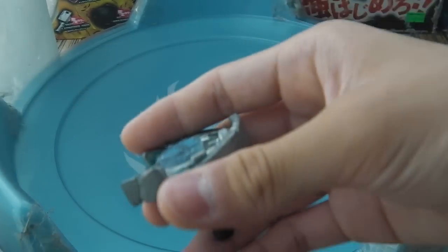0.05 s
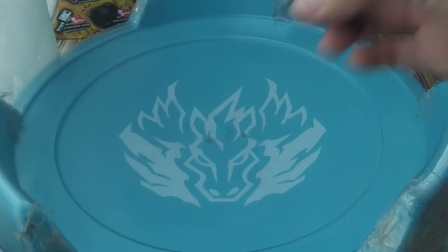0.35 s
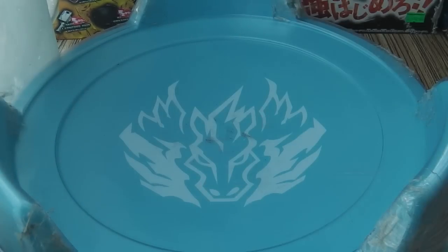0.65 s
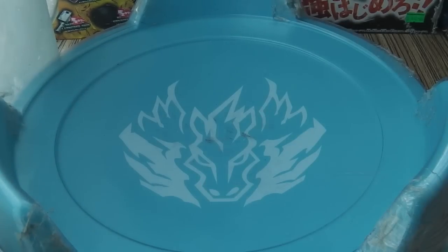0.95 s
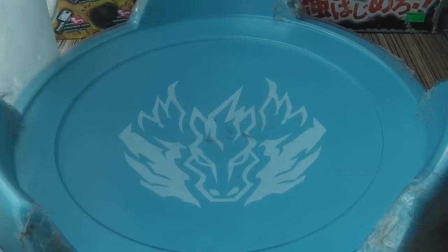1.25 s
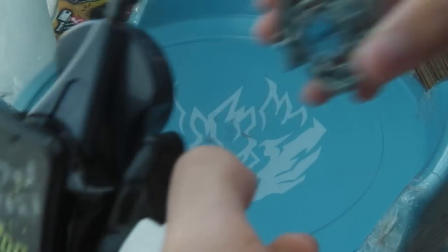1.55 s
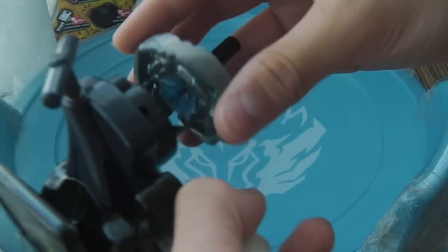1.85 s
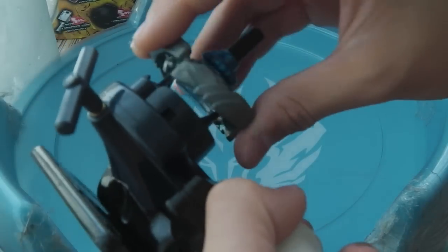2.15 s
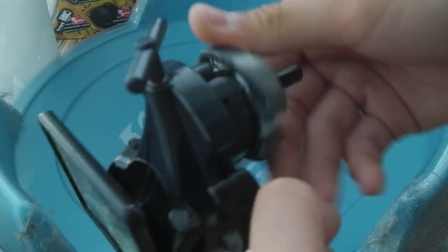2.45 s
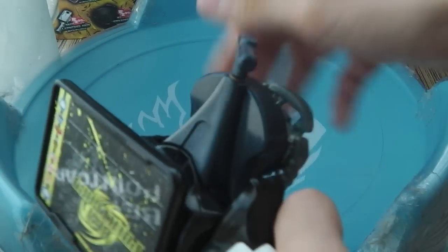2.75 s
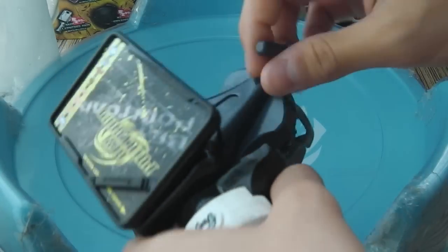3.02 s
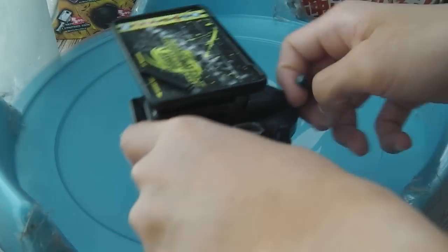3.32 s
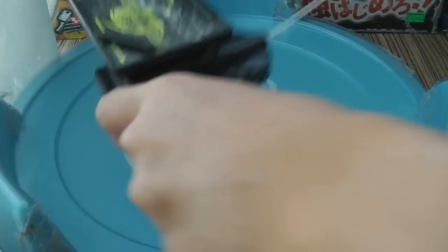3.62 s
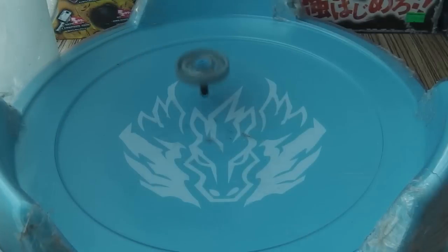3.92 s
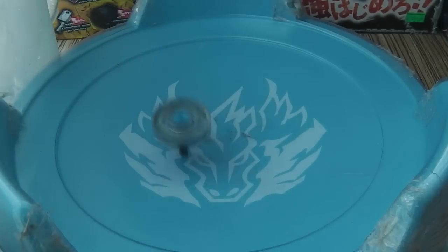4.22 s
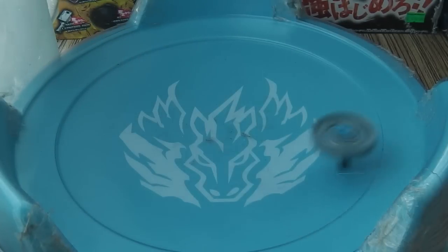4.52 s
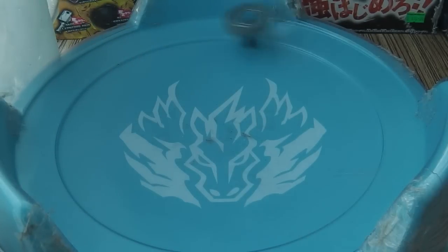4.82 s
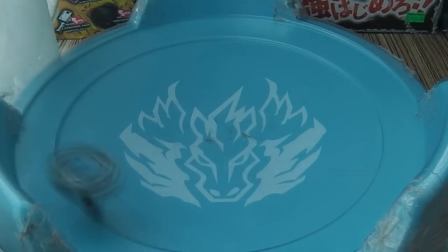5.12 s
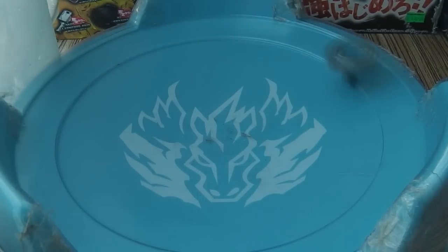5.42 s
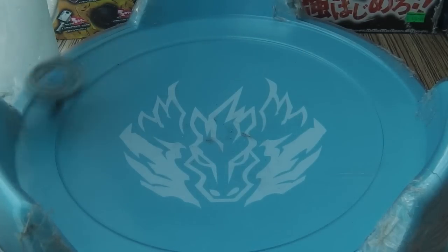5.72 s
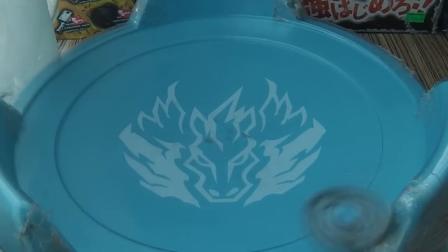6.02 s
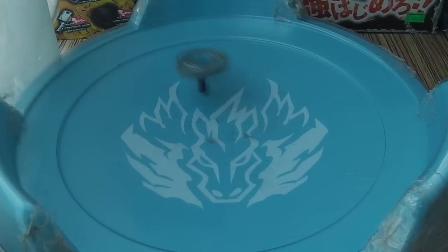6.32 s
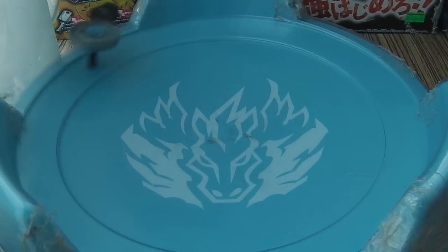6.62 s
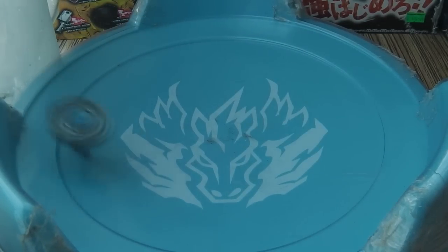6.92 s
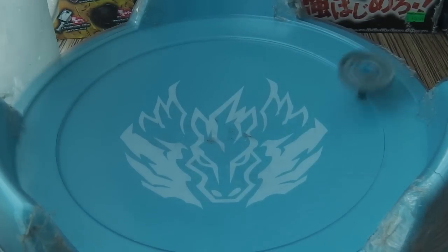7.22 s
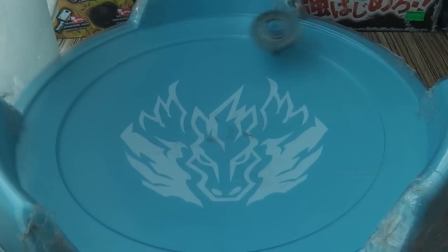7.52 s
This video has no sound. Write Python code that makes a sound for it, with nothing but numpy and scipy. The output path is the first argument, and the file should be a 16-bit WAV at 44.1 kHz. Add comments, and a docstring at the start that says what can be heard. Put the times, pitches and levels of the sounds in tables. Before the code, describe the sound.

A small quiet room with faint hiss, hum and low rumble, heard close above a thin plastic bowl. At about 0.5 seconds there is a hollow knock, and until 3.2 seconds scattered plastic clicks and soft rubs follow as a toy spinning top is fitted to its launcher, the firmest around 2.5 seconds. At 3.4 seconds the string is pulled with a loud, rising zip of gears, ending in a sharp snap at 3.6. The top drops and bounces, each landing a tick and a low boom, settling by about 4.3 seconds. It then races around the bowl, its tip scraping, skidding and chattering in surges while the floor drums, strongest from 4.7 to 5.5 seconds. Hollow clacks against the wall come near 5.8, 6.1, 6.7 and 6.9 seconds, with more small hops. A deep rumble swells briefly around 7.3 seconds as the top keeps rattling.

```python
"""A small quiet room, just above a thin plastic bowl. A toy spinning top is clicked onto a plastic
string launcher and ripped loose with a rising zip of gear teeth. It drops into the bowl and bounces,
each landing a tick and a boom of the floor, then races round the slope, its tip scraping, skidding
and chattering. Now and then the wall gives a hollow clack. Under it all lie hiss, hum and rumble,
and the bass swells briefly near the end."""
import sys
import numpy as np
from scipy import signal
from scipy.fft import rfft, irfft, next_fast_len
from scipy.io import wavfile
from scipy.ndimage import uniform_filter1d

SR = 44100
rng = np.random.default_rng(int(sys.argv[2]) if len(sys.argv) > 2 else 0)


def wrap_up_sound(samples):
    """Save the sound to the file named by the first command line argument, as 16-bit audio."""
    columns = np.atleast_2d(samples).T
    # keep every value between -1 and 1, then stretch to whole-number steps
    tamed = np.clip(columns, -1, 1)
    steps = np.round(tamed * 32767).astype(np.int16)
    wavfile.write(sys.argv[1], SR, steps)


N = 342216
TIME = np.arange(N) / SR
FFT_SIZE = next_fast_len(N + SR // 2)
BIN_HZ = np.maximum(np.arange(FFT_SIZE // 2 + 1) * SR / FFT_SIZE, 1)

# Levels in all tables are relative: each layer sets its own gain.
# modes of the bowl's floor: pitch_hz, struck_db, under_running_tip_db, t60_s
FLOOR_MODES = [(114.2, -31, -2.5, 0.15), (127, -18, -9, 0.17), (149.8, -19, -42, 0.35),
               (171, -49.5, -35, 0.22), (206.6, -13.5, -11, 0.18), (229, -3.5, -2, 0.1),
               (262.2, -13.5, 7.5, 0.11), (287, -64, -2.5, 0.19), (310, -66, -2.5, 0.13)]
# resonances of top and bowl under the tip: pitch_hz, width_hz, level_db
TIP_RESONANCES = [(484, 21, 10.5), (1137, 20, -1.5), (5270, 220, -7.5), (10650, 570, 4)]


def from_db(db):
    """Decibels to gain."""
    return 10 ** (np.asarray(db) / 20)


def unit_rms(x):
    """Scale to an rms of 1."""
    return x / np.sqrt(np.mean(x ** 2) + 1e-20)


def fader(rows, column=1, fade_db_per_s=600):
    """Gain over time along one dB column of a timed curve, fading quickly beyond its ends."""
    time_s, db = np.array(rows)[:, 0], np.array(rows)[:, column]
    outside_s = np.maximum(np.maximum(time_s[0] - TIME, TIME - time_s[-1]), 0)
    return from_db(np.interp(TIME, time_s, db) - np.minimum(fade_db_per_s * outside_s, 100))


def swells(rows, attack_db_per_s, release_db_per_s):
    """Gain of strokes (start_s, length_s, level_db) that rise, hold and die away."""
    gain = np.zeros(N)
    for start_s, length_s, db in rows:
        attack_db = attack_db_per_s * np.maximum(start_s - TIME, 0)
        release_db = release_db_per_s * np.maximum(TIME - start_s - length_s, 0)
        gain += from_db(db - np.minimum(attack_db + release_db, 120))
    return gain


def drift(rate_hz):
    """A random wander of rms 1 that turns about rate_hz times a second."""
    knots = rng.standard_normal(8192)
    return unit_rms(np.interp(TIME * rate_hz, np.arange(len(knots)), knots))


def eq_curve(points):
    """Gain at every frequency from (frequency_hz, level_db) points."""
    hz, db = np.transpose(points)
    return from_db(np.interp(np.log(BIN_HZ), np.log(hz), db))


def equalise(x, response):
    """Apply a frequency response."""
    return irfft(rfft(x, FFT_SIZE) * response, FFT_SIZE)[..., :N]


def colour(x, points, resonances=()):
    """Play x through a body: a minimum-phase EQ with resonances that keeps the power of white noise."""
    peaks = sum(from_db(db) / (1 + (2 * (BIN_HZ - hz) / width) ** 2) for hz, width, db in resonances)
    gain = unit_rms(eq_curve(points) * (1 + peaks))
    cepstrum = irfft(np.log(gain), FFT_SIZE)
    cepstrum[1:FFT_SIZE // 2] *= 2
    cepstrum[FFT_SIZE // 2 + 1:] = 0
    return equalise(x, np.exp(rfft(cepstrum)))


def butter(x, hz, kind, order=2):
    """Causal low-, high- or band-pass."""
    return signal.sosfilt(signal.butter(order, hz, kind, fs=SR, output="sos"), x + 1e-18)


def stereo(mid_side):
    """Mid and side to left and right: narrow in the bass and mids, wide in the treble."""
    # stereo width: frequency_hz, side_against_mid_db
    width = [(100, -7.5), (1000, -9.5), (2500, -11.5), (5000, -3.5), (7000, -1), (10000, 0.5),
             (16000, -2.5)]
    mid, side = mid_side[0], equalise(mid_side[1], eq_curve(width))
    return np.array([mid + side, mid - side])


def ring(force, hz, t60_s):
    """One mode: a unit click starts a decaying sine of height 1."""
    radius, angle = 10 ** (-3 / (t60_s * SR)), 2 * np.pi * hz / SR
    return signal.lfilter([0, np.sin(angle)], [1, -2 * radius * np.cos(angle), radius ** 2], force + 1e-18)


def strike(times_s, levels_db, modes, scatter_db):
    """Blows on a set of modes, each mode a little stronger or weaker on every blow."""
    out = np.zeros(N)
    for hz, db, t60_s in modes:
        force = np.zeros(N)
        uneven_db = scatter_db * rng.standard_normal(len(times_s))
        force[(times_s * SR).astype(int)] = from_db(levels_db + db + uneven_db)
        out += ring(force, hz, t60_s)
    return out


def dense_ring(t60_s, samples=6000):
    """Decaying mid and side noise: modes too dense to tell apart."""
    return rng.standard_normal((2, samples)) * 10 ** (-3 * np.arange(samples) / SR / t60_s)


def cracks(times_s, levels_db, t60_s, rise_s):
    """Hard contacts: a quick build-up into a short ring with a faint longer tail."""
    out = np.zeros((2, N))
    for start_s, db in zip(times_s, levels_db):
        at = int(start_s * SR)
        burst = (dense_ring(t60_s) + from_db(-15) * dense_ring(3.3 * t60_s))[:, :N - at]
        age_s = np.arange(burst.shape[1]) / SR
        out[:, at:at + len(age_s)] += from_db(db) * burst * (1 - np.exp(-age_s / rise_s))
    return out


def friction(slips_per_s, spread_db, t60_s, spots=5):
    """Tiny slips of uneven size, each ringing one of a few spots on the plastic; rms 1."""
    sizes = from_db(spread_db * np.minimum(rng.exponential(1, N), 3.5)) * rng.choice([-1, 1], N)
    slips = sizes * (rng.random(N) < slips_per_s / SR)
    spot = rng.integers(0, spots, N)
    out = np.zeros((2, N))
    for k in range(spots):
        spot_ring = dense_ring(t60_s, samples=1500)
        out += signal.oaconvolve((slips * (spot == k))[None], spot_ring, axes=1)[:, :N]
    return unit_rms(out)


def moving_contact(x, depth_db, rate_hz, bands=20):
    """The contact point keeps moving, so each band of modes answers more or less strongly by turns."""
    band_position = np.interp(np.log(BIN_HZ), np.log([700, 14000]), [0, bands - 1])
    spectrum = rfft(x, FFT_SIZE)
    out = np.zeros((2, N))
    for k in range(bands):
        band = irfft(spectrum * np.maximum(1 - np.abs(band_position - k), 0), FFT_SIZE)[:, :N]
        out += band * unit_rms(from_db(depth_db * np.clip(drift(rate_hz), -2, 2)))
    return out


def room_tone():
    """The hiss of the room, a low rumble of air and a hum."""
    # spectra of hiss and rumble: frequency_hz, level_db
    hiss_eq = [(53, -17), (90, -19), (125, -1), (368, -16), (6300, -29), (8000, -31), (10100, -28),
               (16000, -42)]
    rumble_eq = [(20, -13.5), (33, 7.5), (45, 1), (100, -21.5), (200, -47.5)]
    # rise and fall of the rumble: time_s, level_db
    rumble_curve = [(0, -32), (3.3, -37.5), (3.8, -50), (4.7, -34), (5.6, -51), (7.1, -43), (7.28, -25),
                    (7.5, -35), (7.76, -32)]
    hiss = from_db(-49) * stereo(colour(rng.standard_normal((2, N)), hiss_eq))
    rumble = fader(rumble_curve) * stereo(colour(rng.standard_normal((2, N)), rumble_eq))
    hum = from_db(-45.5) * unit_rms(ring(rng.standard_normal(N), hz=113.4, t60_s=0.36))
    return hiss + rumble + hum


def handling():
    """Plastic latches click, parts slide between the fingers and the top's metal ring answers faintly."""
    # parts clicking: start_s, level_db, treble_against_mids_db
    latches = [(0.4633, -19, 1), (0.4824, -14, 4.5), (0.9274, -7, -0.5), (0.9422, -5, -6),
               (0.9646, -6.5, 1.5), (1.047, -8, -0.5), (1.1218, -13, -7.5), (1.2273, -14.5, -10),
               (1.2503, -14.5, -9), (1.559, -23, 10), (1.6316, -17, 4), (1.6898, -14.5, 5),
               (1.723, -12, -8), (1.8347, -21, 13), (1.8689, -4.5, 3.5), (1.943, -13, -7),
               (2.0325, -9.5, -4), (2.2676, -15, 4), (2.4031, -10.5, -1), (2.4366, -3.5, -2.5),
               (2.518, -1.5, -3.5), (2.5256, -1.5, -3), (2.6744, -12, 3.5), (2.72, -3.5, -6),
               (2.9508, -22.5, 8.5), (3.1907, -13, 2.5), (3.5767, 5, 5.5)]
    # fingers and parts sliding: start_s, length_s, level_db
    strokes = [(0, 0.17, -37.5), (.725, 0.0075, -31), (.94, 0.057, -22), (1.06, 0.12, -45.5),
               (2.23, 0.11, -39), (2.39, 0.025, -26), (2.54, 0.039, -43)]
    # spectra of clicks and rubs: frequency_hz, level_db
    click_eq = [(300, -14.5), (600, -11.5), (1150, -2), (1780, -2.5), (2700, 1), (5700, 2), (7300, 2),
                (8500, -3.5), (10500, -1.5), (13000, -11), (16000, -28)]
    rub_eq = [(300, -7.5), (2800, -5), (5500, 0), (10500, 1), (16000, -13)]
    # blows that reach the metal ring: start_s, level_db
    clinks = [(2.722, -37), (3.578, -32)]
    # modes of the metal ring: pitch_hz, level_db, t60_s
    metal_modes = [(3117, -8, .2), (3865, 0, .22), (3990, -5, .16), (4390, -5, .14)]
    start_s, db, bright_db = np.vstack([latches, loose_ticks()]).T
    mids = cracks(start_s, db - bright_db / 2, t60_s=0.038, rise_s=0.00054)
    treble = cracks(start_s, db + bright_db / 2, t60_s=0.038, rise_s=0.00054)
    snaps = butter(mids, [250, 4200], "band") - butter(treble, 3900, "high")
    clicks = from_db(-7.5) * colour(snaps, click_eq)
    sliding = colour(friction(slips_per_s=2200, spread_db=3.5, t60_s=0.016), rub_eq)
    rubs = from_db(-4.5) * swells(strokes, attack_db_per_s=598, release_db_per_s=237) * sliding
    plastic = moving_contact(clicks + rubs, depth_db=2.8, rate_hz=50)
    return stereo(plastic) + strike(*np.transpose(clinks), metal_modes, scatter_db=1)


def wall_knocks():
    """A blow on the bowl's stiff wall gives a hollow clack."""
    # blows on the wall: start_s, level_db
    knocks = [(0.529, -2.5), (5.772, -3), (6.056, -3.5), (6.671, 3), (6.869, -2.5), (7.307, -16),
              (7.428, -18), (7.513, -16.5)]
    # spectrum of the clack: frequency_hz, level_db
    clack_eq = [(200, -10), (350, -1), (1150, 0), (2000, -11), (6000, -16), (16000, -32)]
    # modes of the wall: pitch_hz, level_db, t60_s
    wall_modes = [(323, -8, .07), (450, -7, .06), (550, -4, .08), (705, -2, .08), (825, -1, .07),
                  (1070, 0, .07)]
    start_s, db = np.transpose(knocks)
    clack = colour(cracks(start_s, db - 7.5, t60_s=0.044, rise_s=0.001), clack_eq)
    return stereo(clack) + strike(start_s, db - 16, wall_modes, scatter_db=3.5)


def loose_ticks(count=14, from_s=0.7, to_s=3.3):
    """Loose parts tick faintly in the hands: rows of start_s, level_db, treble_against_mids_db."""
    jitter, size, dullness = rng.random((count, 3)).T
    start_s = from_s + (to_s - from_s) * (np.arange(count) + jitter) / count
    return np.transpose([start_s, -30 + 3 * (2 * size - 1), -10 * dullness])


def launcher():
    """Gear teeth mesh ever faster as the string is pulled; ratchet and string rasp along."""
    # the pull of the string: time_s, level_db
    pull = [(3.36, -41), (3.425, -31), (3.46, -18), (3.49, -13), (3.525, -9.5), (3.555, -14), (3.578, -12),
            (3.595, -19), (3.63, -45)]
    # the gears, singing most at the hardest tug: time_s, teeth_per_s, whine_against_rasp_db
    gears = [(3.455, 850, -15), (3.484, 1180, -13), (3.498, 1420, 1), (3.512, 1700, -16), (3.55, 2150, -22),
             (3.57, 2400, -25)]
    # spectrum of the rasp: frequency_hz, level_db
    rasp_eq = [(800, -14), (1380, -5.5), (3400, -2.5), (6600, -1), (8500, -8.5), (10400, -5.5),
               (16000, -25)]
    time_s, teeth_per_s, _ = np.transpose(gears)
    mesh_hz = np.interp(TIME, time_s, teeth_per_s) * (1 + 0.028 * drift(400))
    phase = 2 * np.pi * np.cumsum(mesh_hz) / SR
    whine = (np.sin(phase) + .3 * np.sin(2 * phase)) * from_db(2 * drift(300))
    slips = friction(slips_per_s=4300, spread_db=4, t60_s=0.018) * (1 + .5 * np.cos(phase))
    rasp = butter(colour(slips, rasp_eq), 850, "high")
    return fader(pull) * (stereo(rasp) + fader(gears, column=2) * whine)


def rebounds():
    """Landings (start_s, tick_db, thump_db): flights shrink after a fall, grow where spin feeds them."""
    # runs of bounces: start_s, first_flight_s, flight_share_kept, flight_lost_s, landings, hard_landings
    runs = [(3.617, .1582, .991, .0203, 8, 5), (6.1952, .1031, .746, -.0032, 5, 5),
            (6.568, .0325, 1.05, 0, 5, 5), (7.4251, .0402, 1.18, 0, 4, 4)]
    # how hard each run lands: tick_db, thump_db
    strengths = [(-5, -5), (-5, -7.5), (-9, -10.5), (-8, -12)]
    rows = []
    for (start_s, flight_s, kept, lost_s, count, hard), (tick_db, thump_db) in zip(runs, strengths):
        for k in range(count):
            settled = k >= hard  # the last small hops land softly
            rows.append((start_s, tick_db - 14.5 * settled, thump_db - 19.5 * settled))
            start_s += flight_s
            flight_s = flight_s * kept - lost_s
    return np.array(rows)


def landings(scrape, drumming):
    """Each landing of the tip ticks, and the thin floor gives way softly and booms."""
    # single jolts of the tip on the bowl: start_s, tick_db, thump_db
    jolts = [(4.145, -7, -51), (4.4151, -15, -14), (4.5703, -14.5, -12), (4.6503, -6.5, -26),
             (5.018, -12, -13), (5.4981, -3.5, -18), (5.5397, -5, -40), (5.7727, -4, -10.5),
             (6.0506, -9, -11), (6.5129, -1, -20), (6.5299, -6.5, -13), (6.755, -3.5, -8.5),
             (6.787, -5, -12), (6.8695, -5.5, -15), (7.1485, -6.5, -22), (7.244, -5.5, -15.5),
             (7.303, -4.5, -7), (7.3484, -10.5, -4), (7.6163, -7, -27)]
    # spectrum of a tick: frequency_hz, level_db
    tick_eq = [(300, -9.5), (1000, -4.5), (1800, 3), (3200, 4.5), (5500, 1), (8500, -4.5), (10500, -2.5),
               (12500, -9.5), (16000, -17.5)]
    start_s, tick_db, thump_db = np.vstack([rebounds(), jolts, chatter(scrape, drumming)]).T
    contacts = cracks(start_s, tick_db, t60_s=0.025, rise_s=0.00057)
    ticks = from_db(-1) * colour(contacts, tick_eq, TIP_RESONANCES)
    struck_modes = [(hz, db, t60_s) for hz, db, _, t60_s in FLOOR_MODES]
    floor = strike(start_s, thump_db + 3, struck_modes, scatter_db=3.5)
    boom = butter(butter(floor, 350, "low", order=6), 95, "high")
    return stereo(moving_contact(ticks, depth_db=4, rate_hz=45)) + boom


def tip_load(leap_from_s=6.065, leap_to_s=6.195):
    """Gains of scrape and drumming; both die away while the top is in the air, thrown off the wall."""
    # load on the lapping tip, heaviest high on the slope: time_s, scrape_db, drumming_db
    laps = [(3.63, -35, -46), (4.25, -41, -34), (4.42, -31, -21.5), (4.78, -37, -23.5), (5.03, -16, -19),
            (5.27, -17.5, -26), (5.48, -19.5, -17), (5.63, -31.5, -37.5), (5.74, -32.5, -18.5),
            (5.86, -37, -34), (6.0, -22, -19.5), (6.25, -44, -36.5), (6.68, -43, -20), (6.88, -51, -19.5),
            (6.98, -45.5, -34), (7.11, -26, -25), (7.32, -39.5, -21), (7.5, -54, -24.5),
            (7.58, -23.5, -19.5), (7.76, -28.5, -21.5)]
    # the tip bites and skids: start_s, length_s, scrape_db
    skids = [(4.555, 0.008, -32), (4.66, 0.019, -18), (4.85, 0.058, -20), (6.036, 0.014, -18),
             (6.765, 0.076, -19.5), (7.37, 0.016, -19)]
    aloft_s = np.maximum(TIME - leap_from_s, 0) * (TIME < leap_to_s)
    touching = from_db(-550 * aloft_s)
    scrape = fader(laps) + swells(skids, attack_db_per_s=576, release_db_per_s=441)
    return scrape * touching, fader(laps, column=2) * np.sqrt(touching)


def running_tip(scrape, drumming):
    """The tip scrapes in step with the slowing spin; pressed harder, it grinds brighter."""
    # spectra of light scraping and hard grinding: frequency_hz, level_db
    scrape_eq = [(300, -18), (600, 0.5), (1200, -2), (1800, -3), (2600, 3.5), (4000, 0), (6800, 3),
                 (8500, -11), (10500, -9), (12500, -5), (16000, -25)]
    grind_eq = [(600, -22), (2000, -6), (3400, 0.5), (5300, 0), (8500, -8), (10500, -11), (16000, -22)]
    spin_hz = np.interp(TIME, [3.6, 7.8], [105, 64]) * (1 + .05 * drift(30))
    turns = np.cumsum(spin_hz) / SR
    wobble = unit_rms(from_db(2.2 * np.cos(2 * np.pi * turns) + 2.9 * drift(80)))
    pressure = np.clip(scrape / from_db(-16), 0, 1)
    light_slips = friction(slips_per_s=3000, spread_db=6, t60_s=0.0069, spots=8) * wobble
    hard_slips = friction(slips_per_s=5000, spread_db=6, t60_s=0.0044, spots=8) * wobble
    light = from_db(-1.5) * colour(light_slips, scrape_eq, TIP_RESONANCES)
    light += from_db(-3) * squeaks() / (1 + pressure ** 2)
    grind = from_db(2) * colour(hard_slips, grind_eq, TIP_RESONANCES)
    contact = scrape * (light / (1 + pressure) + pressure * grind)
    whirr = contact + spin_rattle(turns, scrape)
    floor = from_db(-2.5) * drumming * floor_drumming(wobble)
    return stereo(moving_contact(whirr, depth_db=3.5, rate_hz=60)) + floor


def squeaks(catches_per_s=520, spots=16):
    """The tip catches and lets go: brief rings scattered over nearly an octave; rms 1."""
    catches = rng.standard_normal(N) * (rng.random(N) < catches_per_s / SR)
    spot = rng.integers(0, spots, N)
    pitches_hz = np.geomspace(1550, 2900, spots)
    return unit_rms(sum(ring(catches * (spot == k), hz, t60_s=.036) for k, hz in enumerate(pitches_hz)))


def spin_rattle(turns, scrape):
    """Loose parts of the top rattle once a turn, more so as it slows and tilts."""
    # spectrum of the rattle: frequency_hz, level_db
    rattle_eq = [(2000, -21), (6800, 6.5), (10700, 1.5), (16000, -7.5)]
    bursts = rng.standard_normal((2, N)) * np.exp(-5 * (turns % 1))
    drive = scrape / (scrape + from_db(-31))  # levels off once the tip is loaded
    tilt = np.interp(TIME, [4.1, 6.2], [.35, 1])
    return from_db(-15.5) * drive * tilt * colour(bursts, rattle_eq, TIP_RESONANCES)


def floor_drumming(wobble, bumps_per_s=600):
    """Small bumps under the tip ring the floor; held at an even level for the tip's load to scale."""
    bumps = rng.standard_normal(N) * (rng.random(N) < bumps_per_s / SR) * wobble
    floor = np.zeros(N)
    for k, (hz, _, db, t60_s) in enumerate(FLOOR_MODES):
        floor += (-1) ** k * from_db(db + 5.55 * drift(9)) * ring(bumps, hz, t60_s)
    floor = butter(floor, 346, "low")
    return floor / np.sqrt(uniform_filter1d(floor ** 2, size=3000) + 1e-9)


def chatter(scrape, drumming, from_s=4.3, gap_s=0.042, scatter_db=2, count=120):
    """The settled tip hops unevenly, harder under load: rows of start_s, tick_db, thump_db."""
    gap_jitter, tick_jitter, thump_jitter = rng.standard_normal((count, 3)).T
    start_s = from_s + np.cumsum(gap_s * np.exp(.4 * gap_jitter))
    scrape_db, drumming_db = (20 * np.log10(np.interp(start_s, TIME, g)) for g in (scrape, drumming))
    tick_db = 2.5 + 0.58 * scrape_db + scatter_db * tick_jitter
    thump_db = drumming_db + scatter_db * thump_jitter
    return np.transpose([start_s, tick_db, thump_db])[start_s < TIME[-1]]


def bass_swell():
    """A band of deep noise swells for a moment near the end."""
    # the swell: start_s, length_s, level_db
    surge = [(7.26, 0.26, -31)]
    deep = unit_rms(butter(rng.standard_normal(N), [55, 117], "band"))
    return swells(surge, attack_db_per_s=300, release_db_per_s=35) * deep


def room_reverb(x, wet_db=-15, t60_s=0.18, predelay_s=0.006):
    """The nearby walls add a short diffuse tail."""
    tail = dense_ring(t60_s, samples=20000)
    tail[:, :int(predelay_s * SR)] = 0
    tail /= np.sqrt(np.sum(tail ** 2, axis=1, keepdims=True))
    send = butter(x.mean(axis=0), 215, "high")
    echo = signal.oaconvolve(send[None], tail, axes=1)[:, :N]
    return x + from_db(wet_db) * stereo(echo)


def scene():
    """All sources in the room, leaning left in the bass and right in the treble."""
    # stereo balance: frequency_hz, left_minus_right_db
    balance = [(40, 4.5), (200, 5), (1200, 1.5), (3500, 0), (6800, -3), (10000, -3), (12500, -0.5)]
    load = tip_load()
    toy = handling() + launcher() + wall_knocks() + running_tip(*load) + landings(*load)
    mix = room_reverb(toy) + room_tone() + bass_swell()
    left_gain = np.sqrt(eq_curve(balance))
    return equalise(mix, np.array([left_gain, 1 / left_gain]))


def record(dry, notch_hz=7880, ceiling=1.05, cutoff_hz=15800):
    """The microphone has a narrow notch; peaks are rounded off and the highest treble is cut."""
    notched = signal.lfilter(*signal.iirnotch(notch_hz, Q=13, fs=SR), dry)
    rounded = notched / (1 + (notched / ceiling) ** 4) ** (1 / 4)
    return signal.sosfilt(signal.ellip(10, .2, 70, cutoff_hz, fs=SR, output="sos"), rounded)


dry = scene()
out = record(dry)
wrap_up_sound(out)
```